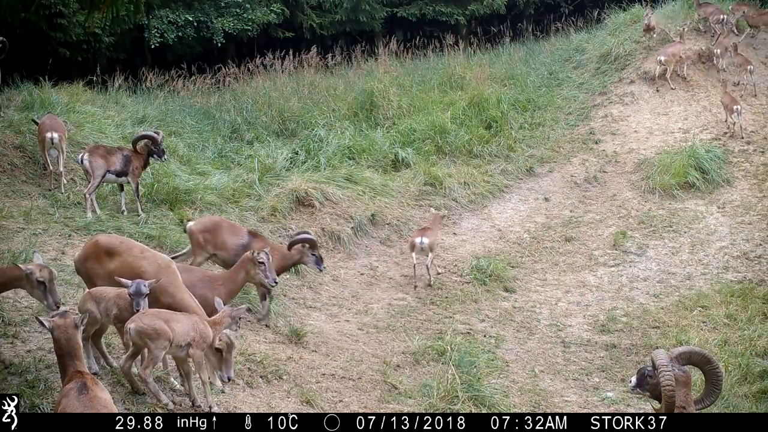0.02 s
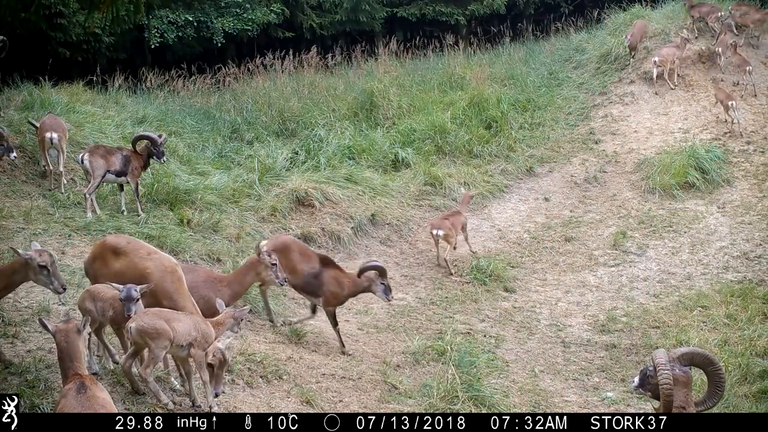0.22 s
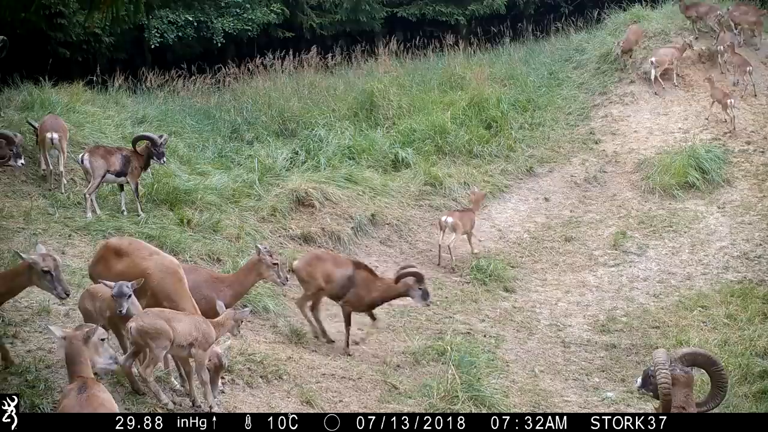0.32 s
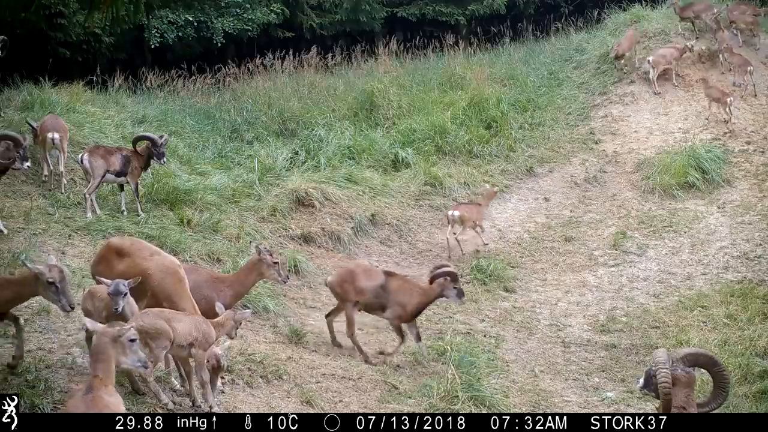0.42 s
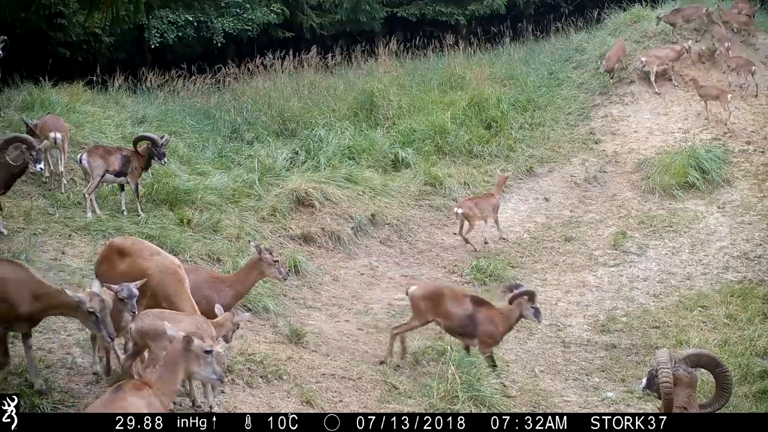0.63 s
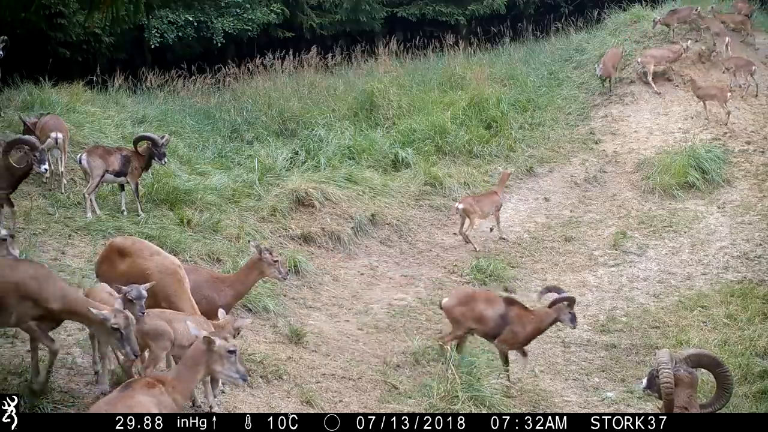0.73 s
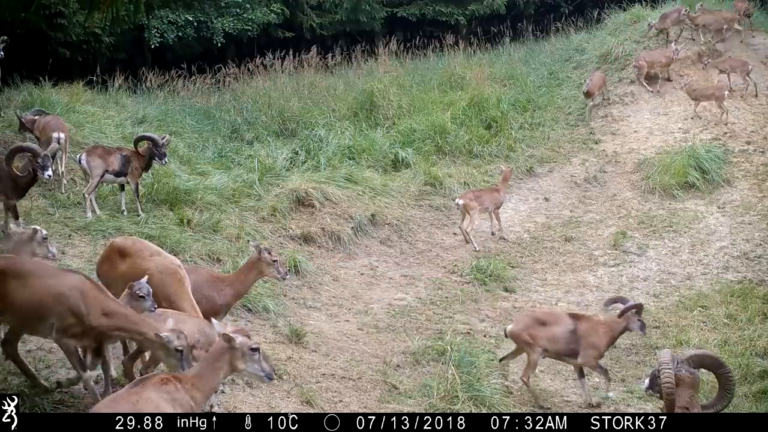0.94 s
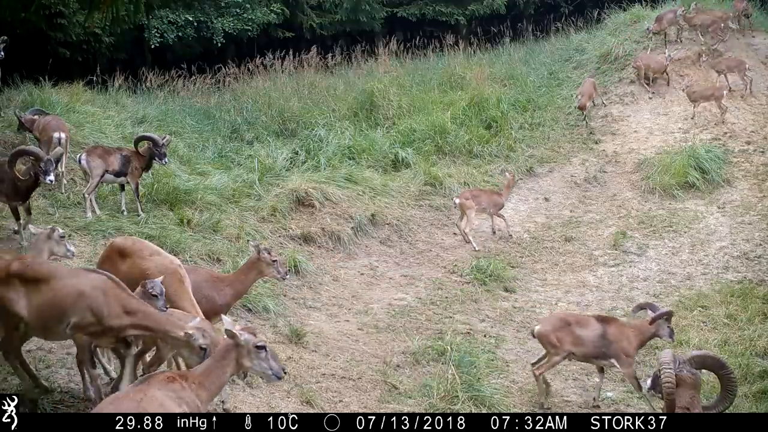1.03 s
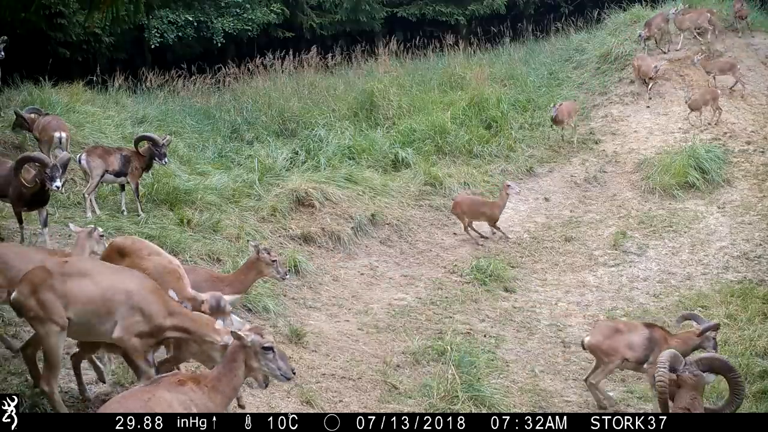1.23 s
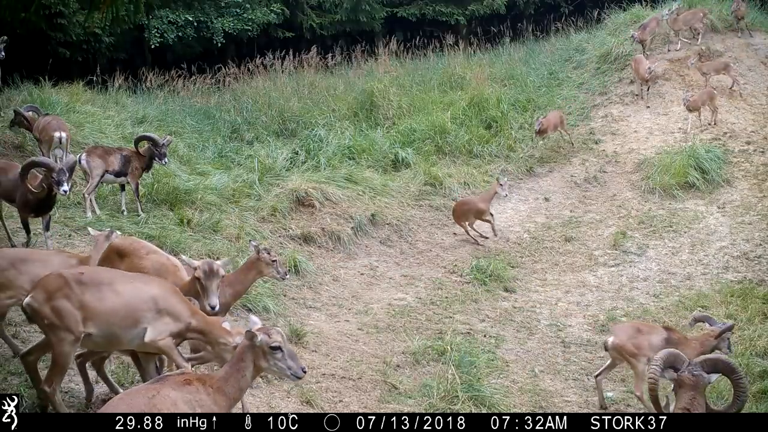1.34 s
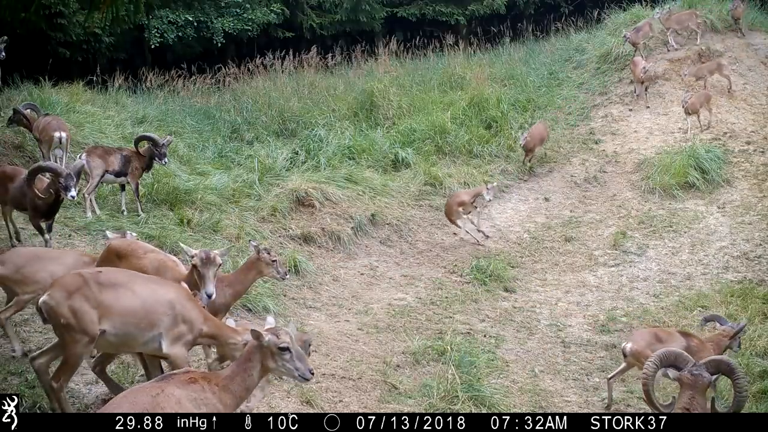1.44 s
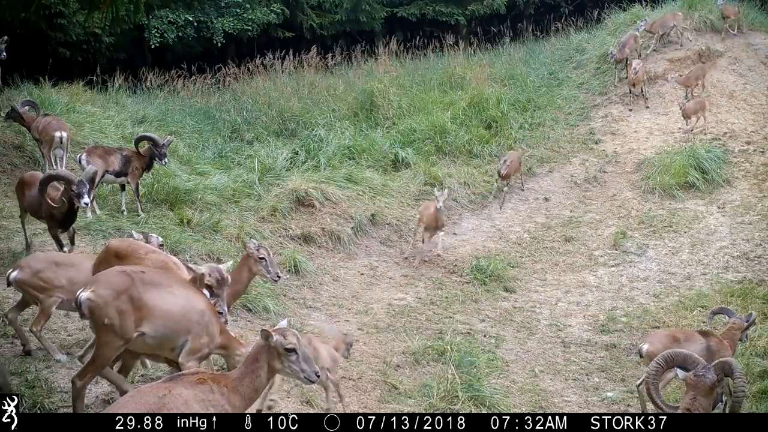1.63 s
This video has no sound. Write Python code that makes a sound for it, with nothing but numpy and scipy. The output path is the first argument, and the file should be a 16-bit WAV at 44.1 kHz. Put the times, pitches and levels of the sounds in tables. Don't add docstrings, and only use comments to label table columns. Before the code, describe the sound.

A sheep bleats once, very close: a muffled closed-mouth hum from 0 to 0.2 seconds, then a loud, nasal, quavering call with about six rapid pulses, rising slightly, ending in a short grunt near 0.6. A brief outdoor tail fades. Hooves knock dry ground around 0.95 to 1.05, the sharpest at 1.03, then softer thuds and light grit scuffs until 1.7. Low wind rumble, hum and dull microphone hiss continue throughout.

```python
import sys
import numpy as np
from scipy import signal
from scipy.fft import rfft, irfft, next_fast_len
from scipy.io import wavfile
from scipy.ndimage import map_coordinates

SR = 44100
rng = np.random.default_rng(int(sys.argv[2]) if len(sys.argv) > 2 else 0)


def undo_db(level):
    steps = np.asarray(level, float) / 20
    return 10 ** steps


def to_wav(sig):
    pcm = np.clip(np.atleast_2d(sig), -1, 1) * 32767
    pcm = np.round(pcm).astype(np.int16)
    wavfile.write(sys.argv[1], SR, pcm.T)


N = 74970
T = np.arange(N) / SR

# time_s, width_s, pitch_hz, level_db, mouth_open_db
BEATS = [(0.023, 0.02, 152.5, -33.5, -23.5), (0.097, 0.023, 167.1, -36, -21),
         (0.165, 0.02, 160.2, -34.5, -13), (.203, 0.0057, 171.1, -51.5, -19.5),
         (0.211, 0.0033, 178.5, -42, -2), (.230, .020, 179.5, -27, -0.5), (.293, .025, 184.8, -29.5, 2),
         (0.353, .024, 193, -25.5, 2.5), (0.412, .025, 199.2, -24.5, 5.5), (.474, .028, 199.2, -24.5, 3),
         (.541, .028, 192.1, -25, 1.5), (.587, .013, 144.8, -29.5, -28)]
LIPS_OPEN_S = (.195, .21)
LIPS_SHUT_S = (.565, .575)
# centre_hz, width_hz, level_db
SHUT_THROAT = [(157.4, 130, 1.5), (326, 144, -3), (623, 128, -6), (1126, 110, -6)]
SHAPE_S = (.235, .30, .36, .47)
# centre_hz, width_hz, level_db
OPEN_THROATS = [
    [(185, 79, -4.5), (492, 250, -10.5), (707, 100, -24.5), (927, 120, 3.5), (1420, 350, -13)],
    [(185, 73, -1), (526, 120, -2), (1010, 200, 4.5), (1440, 230, -10)],
    [(193, 66, -5), (680, 350, -6), (1272, 190, 3), (1780, 300, -2.5)],
    [(208, 70, -1), (713, 184, -1), (1000, 130, -12), (1220, 300, 0), (1782, 210, -2)],
]
# centre_hz, width_hz, level_db
OPEN_MOUTHS = [
    [(2039, 162, 8), (2376, 330, 4.5), (2920, 393, 7.5), (3650, 300, -7)],
    [(1930, 330, 1.5), (2220, 120, 4), (2794, 425, 9), (3280, 240, -2.5)],
    [(1993, 209, 6.5), (2420, 700, -0.5), (2870, 510, 9), (3450, 150, -8)],
    [(1920, 222, 5.5), (2440, 210, 3), (2726, 201, 6), (3208, 197, 6.5), (3604, 210, 0)],
]
# start_s, pitch_hz, peak_db, t60_s
HOOF_KNOCKS = [(.905, 236, -33.5, .12), (.964, 616.6, -25.5, 0.012), (0.972, 246, -18.5, 0.028),
               (0.976, 3400, -28, 0.015), (.983, 105, -24, 0.058), (1.0321, 620, -10.5, 0.008),
               (1.035, 240, -27, 0.019), (1.172, 140, -25, 0.035), (1.211, 300, -31.5, 0.033),
               (1.307, 180, -26, 0.024), (1.656, 1480, -40.5, 0.14)]
# time_s, width_s, level_db
GRIT_SCUFFS = [(.92, 0.028, -45.5), (.963, 0.0021, -30), (0.977, 0.0074, -32.5), (1.034, 0.0089, -34),
               (1.054, .003, -41.5), (1.161, .03, -46.5), (1.443, 0.0033, -39), (1.492, 0.0055, -49),
               (1.564, .012, -41.5), (1.608, .004, -43), (1.67, 0.025, -41.5)]
# freq_hz, density_db
GRIT_SPECTRUM = [(100, -18), (400, 4.5), (1500, 0), (2300, -4.5), (3300, 4), (3900, -2.5), (4400, -17.5)]
# delay_s, level_db
GROUND_BOUNCES = [(.0021, -10.5), (.0047, -16), (.009, -12), (.016, -18)]
# freq_hz, t60_s
SLOPE_DECAY = [(300, .12), (1200, 0.29), (2000, 0.42), (2800, 0.76), (3400, 0.42), (4400, 0.21)]
# freq_hz, density_db
HISS_SPECTRUM = [(60, -31), (150, -0.5), (400, -5), (700, -8), (1300, -11.5), (3300, -9.5), (3800, -13),
                 (4400, -35)]
# freq_hz, density_db
RUMBLE_SPECTRUM = [(15, -19.5), (30, -9), (80, 2.5), (130, -7), (250, -15.5), (500, -42)]


def unit(x):
    return x / np.sqrt(np.mean(x ** 2) + 1e-20)


def along(points, hz):
    point_hz, value = np.transpose(points)
    return np.interp(np.log(hz + 1), np.log(point_hz + 1), value)


def filtered(x, response):
    size = next_fast_len(N + SR // 2)
    return irfft(rfft(x, size) * response(np.fft.rfftfreq(size, 1 / SR)), size)[:N]


def resonate(x, peaks, order=1):
    def response(hz):
        total = 0
        for k, (centre_hz, width_hz, level_db) in enumerate(peaks):
            damping = 1j * hz * width_hz
            total = total + (-1) ** k * undo_db(level_db) * damping / (centre_hz ** 2 - hz ** 2 + damping)
        return total ** order
    return filtered(x, response)


def wobble(rate_hz):
    return map_coordinates(rng.standard_normal(int(N * rate_hz / SR) + 4), [T * rate_hz])


def noise(spectrum):
    return unit(filtered(rng.standard_normal(N), lambda hz: undo_db(along(spectrum, hz))))


def bump(time_s, width_s, fall=1, power=2):
    side_s = width_s * np.where(T > time_s, fall, 1)
    return np.exp(-.5 * np.abs((T - time_s) / side_s) ** power)


def glottal_pulses(cycles):
    whole = np.arange(1, int(cycles[-1]))
    at = np.interp(whole, cycles, np.arange(N))
    taps = at.astype(int)[:, None] + np.arange(-7, 9)
    offset = taps - at[:, None]
    kernel = np.sinc(offset) * np.cos(np.pi * offset / 16) ** 2
    shimmer = undo_db(.8 * wobble(120))[at.astype(int), None]
    return unit(np.bincount(np.clip(taps, 0, N - 1).ravel(), (kernel * shimmer).ravel(), N))


def tract(source, mouth):
    shut = 1 - np.interp(T, LIPS_OPEN_S, [0, 1]) + np.interp(T, LIPS_SHUT_S, [0, 1])
    out = resonate(source * shut, SHUT_THROAT)
    for one, throat, lips in zip(np.eye(len(SHAPE_S)), OPEN_THROATS, OPEN_MOUTHS):
        share = np.interp(T, SHAPE_S, one)
        out = out + resonate(source * (1 - shut) * share, throat)
        out = out + resonate(mouth * share, lips, order=2)
    return out


def bleat():
    time_s, width_s, pitch_hz, level_db, open_db = np.transpose(BEATS)
    flat_top = 2.8
    effort = sum(undo_db(db) * bump(s, 0.89 * w, .75, flat_top)
                 for s, w, db in zip(time_s, width_s, level_db))
    pitch_lag_s, pitch_sag, jitter = .006, .12, .0025
    hold = sum(bump(s + pitch_lag_s, 1.1 * w, .4, flat_top) for s, w in zip(time_s, width_s))
    slack = 1 - np.clip(1.05 * hold, 0, 1)
    hz = np.interp(T, time_s, pitch_hz) * (1 - pitch_sag * slack)
    hz = hz * (1 + jitter * (1 + 8 * slack) * wobble(150))
    cycles = np.cumsum(hz) / SR

    voice = -undo_db(17) * effort * glottal_pulses(cycles)
    puffs = unit(rng.standard_normal(N) * np.exp(-4.0 * (cycles % 1)))
    breath = undo_db(19) * .07 * effort * puffs
    mouth_top_hz = 3880
    mouth = undo_db(np.interp(T, time_s, open_db)) * (voice + breath)
    mouth = undo_db(-3.0) * filtered(mouth, lambda f: 1 / (1 + (f / mouth_top_hz) ** 24))
    return tract(voice + .5 * breath, mouth)


def hooves():
    knocks = 0
    for start_s, pitch_hz, peak_db, t60_s in HOOF_KNOCKS:
        ago_s = np.clip(T - start_s, 0, None)
        knocks = knocks + undo_db(peak_db - 60 * ago_s / t60_s) * np.sin(2 * np.pi * pitch_hz * ago_s)
    swells = sum(undo_db(db) * bump(s, w) for s, w, db in GRIT_SCUFFS)
    return knocks + noise(GRIT_SPECTRUM) * undo_db(1.3 * wobble(300)) * swells


def ground(near):
    bounce = sum(undo_db(db) * np.pad(near, (int(s * SR), 0))[:N] for s, db in GROUND_BOUNCES)
    return filtered(bounce, lambda hz: hz ** 2 / (hz ** 2 + 1500 ** 2))


def slope(near):
    level_db, delay_s = -14, .02
    hz, t, z = signal.stft(rng.standard_normal(SR // 2), SR, nperseg=256)
    decay = undo_db(-60 * t / along(SLOPE_DECAY, hz)[:, None])
    tail = signal.istft(z * decay, SR, nperseg=256)[1]
    late = np.pad(near, (int(delay_s * SR), 0))
    return undo_db(level_db) * signal.fftconvolve(late, tail / np.linalg.norm(tail))[:N]


def air():
    hiss_db = -42.5 + 0.5 * wobble(12.8) + 0.66 * wobble(7.5) + 0.99 * wobble(150)
    hiss = undo_db(hiss_db) * noise(HISS_SPECTRUM)
    hum_hz = 55.2 + 3.0 * wobble(21)
    hum = undo_db(-45 + 0.87 * wobble(12.6)) * np.sin(2 * np.pi * np.cumsum(hum_hz) / SR)
    rumble = undo_db(-43.5 + 0.83 * wobble(14.81)) * noise(RUMBLE_SPECTRUM)
    return hiss + hum + rumble


def scene():
    near = bleat() + hooves()
    return (near + ground(near) + slope(near) + air())[None]


def top_cut(x):
    return signal.sosfilt(signal.butter(12, 4400, fs=SR, output="sos"), x)


def record(dry):
    edge_hz, edge_width_hz, clip = 4400, 40, 1.0
    narrow = filtered(dry[0], lambda hz: 1 / (1 + np.exp(np.clip((hz - edge_hz) / edge_width_hz, -50, 50))))
    mix = np.clip(narrow, -clip, clip)[None]
    return top_cut(mix)


dry = scene()
out = record(dry)
to_wav(out)
```